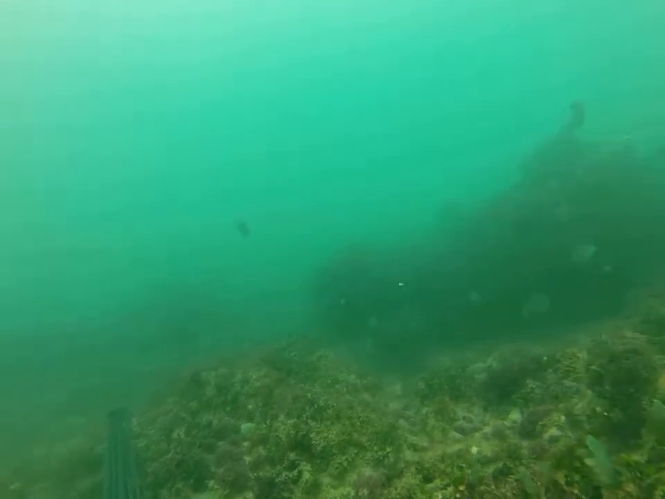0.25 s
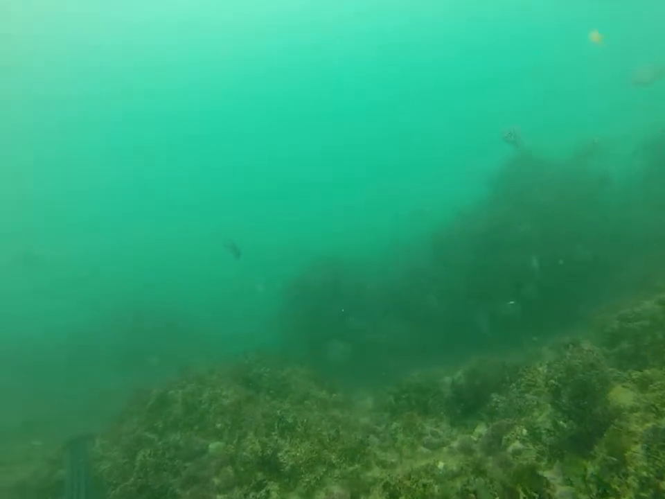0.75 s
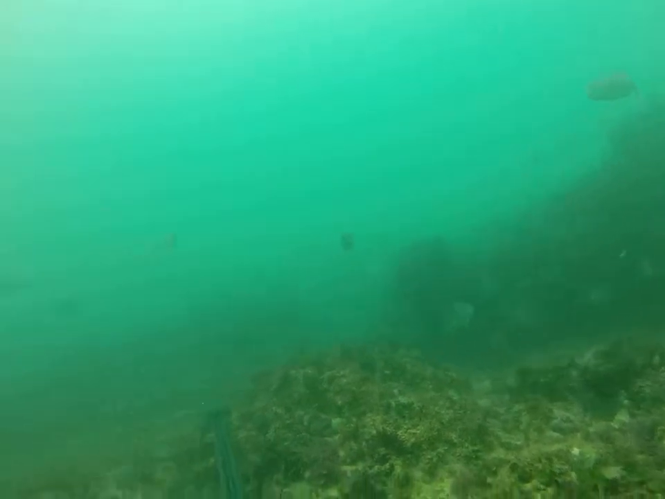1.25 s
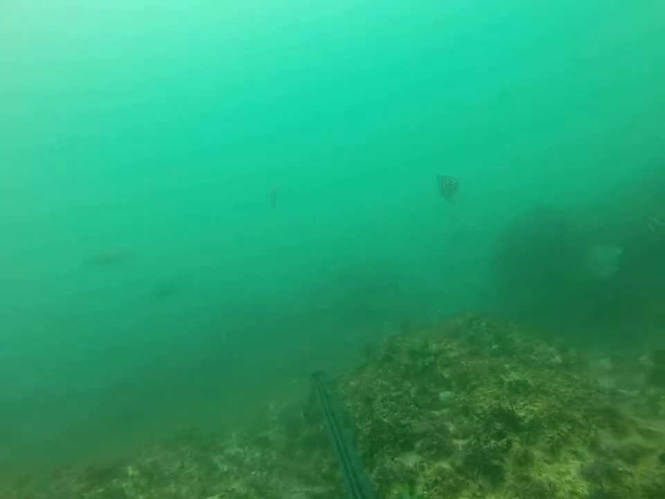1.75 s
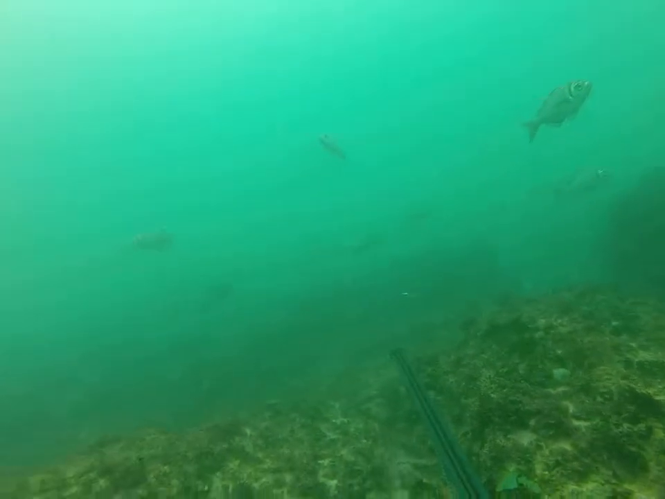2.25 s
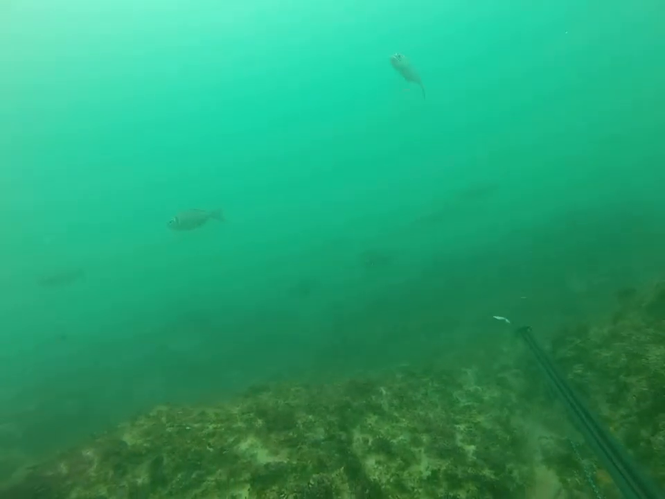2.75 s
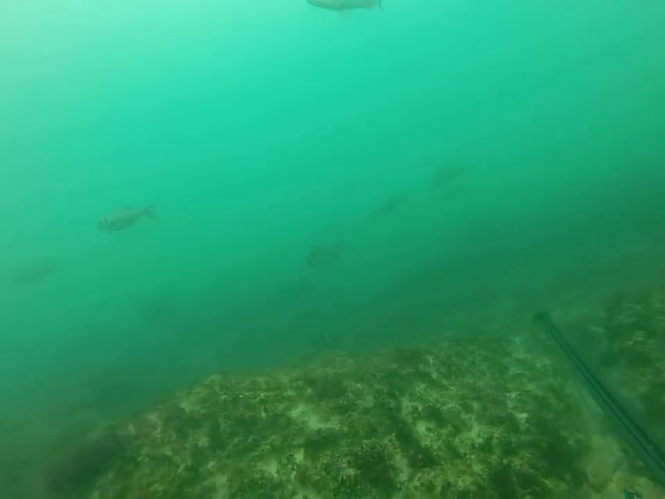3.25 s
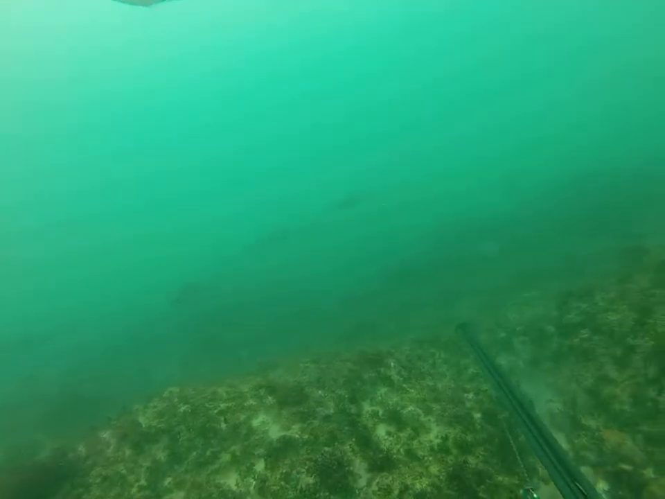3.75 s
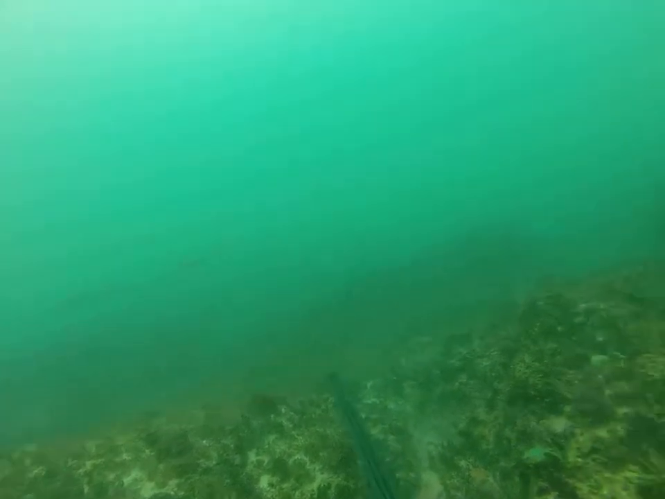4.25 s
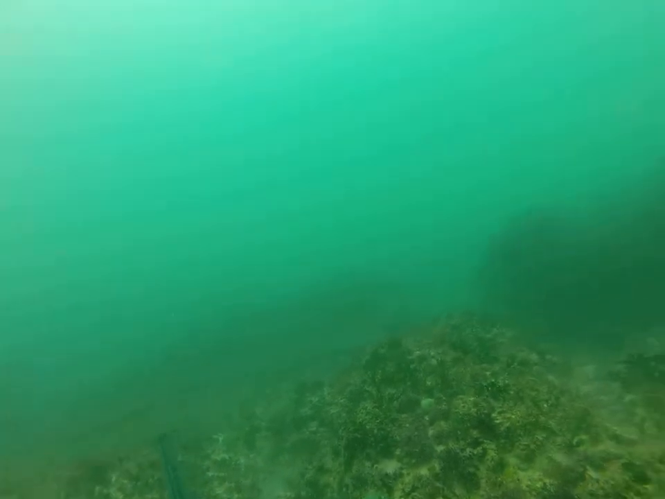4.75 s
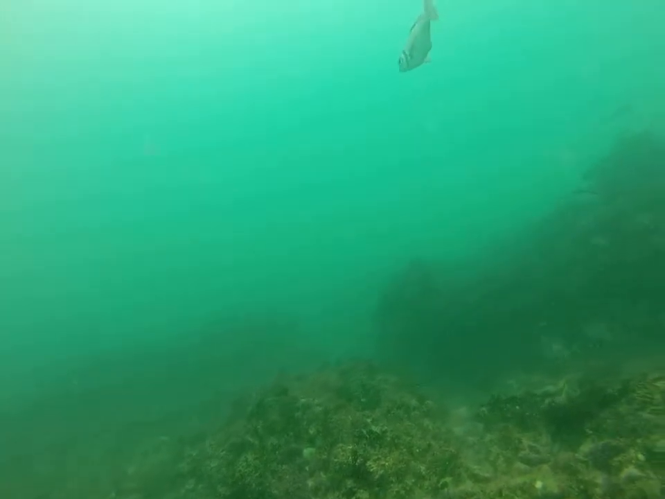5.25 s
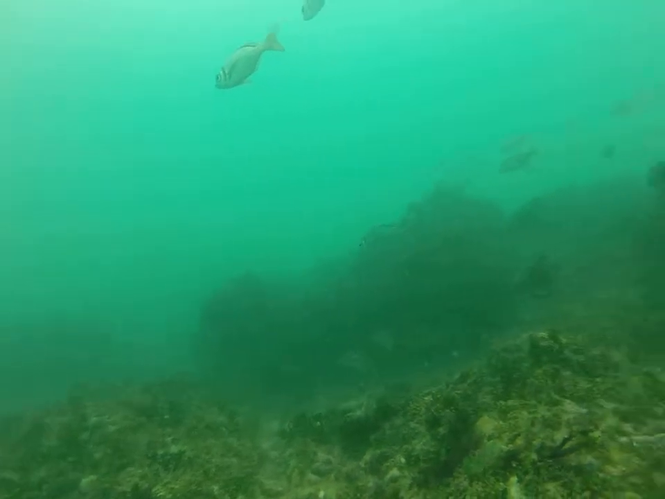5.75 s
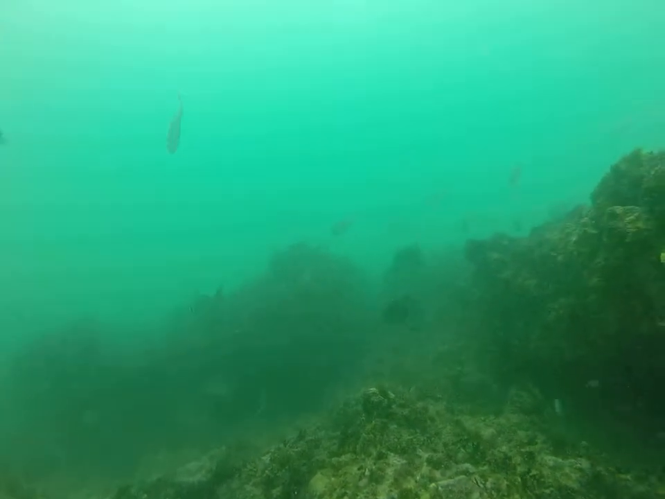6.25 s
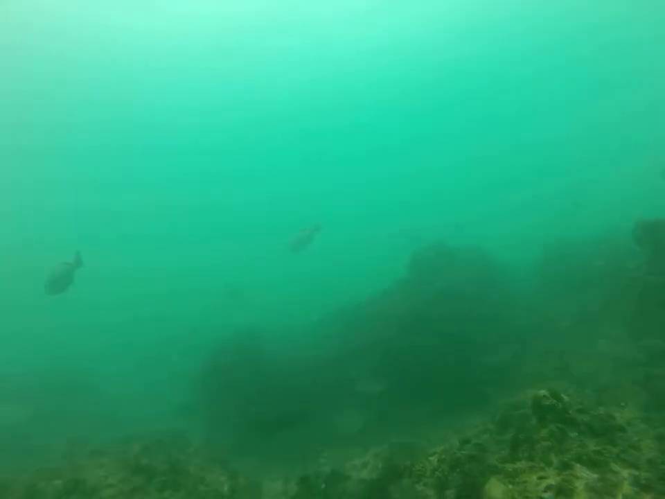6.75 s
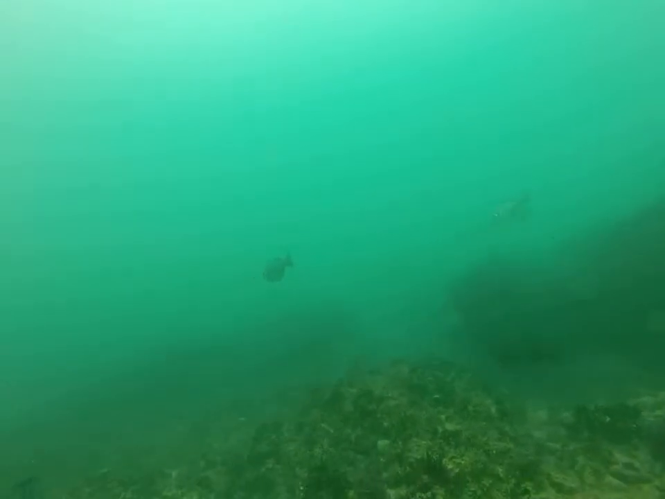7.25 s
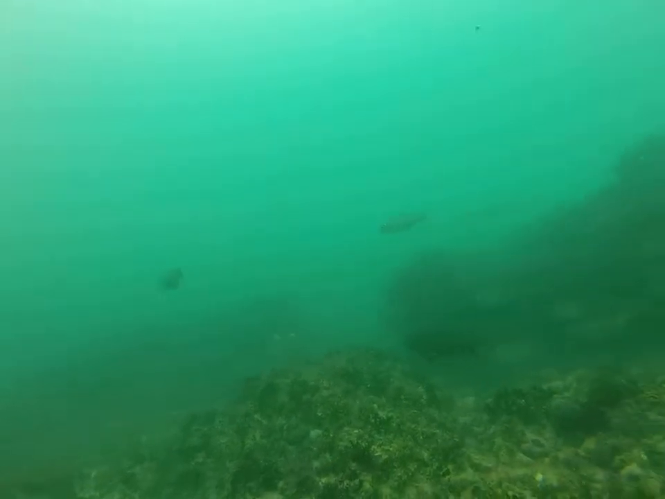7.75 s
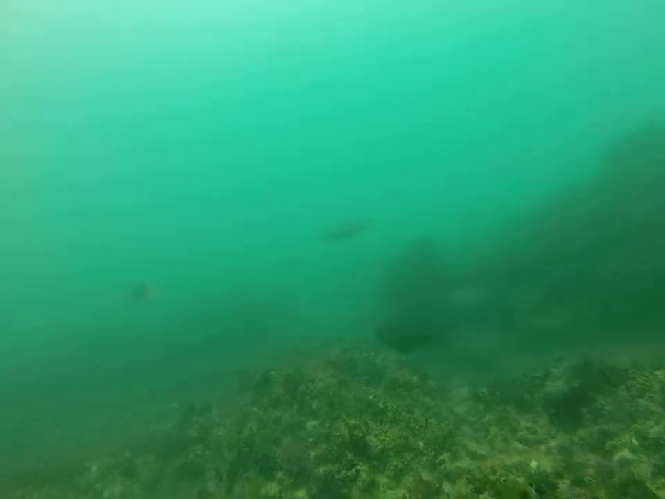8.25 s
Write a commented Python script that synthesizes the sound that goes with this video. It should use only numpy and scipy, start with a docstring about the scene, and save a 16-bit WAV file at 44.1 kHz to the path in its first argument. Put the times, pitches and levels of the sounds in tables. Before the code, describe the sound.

Underwater over a rocky reef, heard through one microphone sealed in a camera housing. A fine crackle of countless distant shrimp runs throughout over faint hiss and low, lumpy water rumble, with nearer dry snaps clicking irregularly, some noticeably louder. Soft pops and faint thumps come around 0.8 seconds. At 2.0 a heavy dull thump lands with hollow pops and a thin strap creak, followed by gurgle and light rubbing. A lone tick sounds at 3.5. At 4.6 another thump brings pops, creaks and a short scrape; a quick creaky stutter follows near 5.1. At 5.96 a deep thud leads into dragging and gurgling until about 6.3. From 6.74 to 6.94 sharp gear ticks cluster around one very loud, hard crack at 6.83, with a low thump. A softer bump and gurgle follow at 7.1, then sparse snaps continue to the end at about 8.5.

```python
"""Shrimp snaps crackle near and far, one crack very close, each ringing the housing of a camera
that drifts with a spear fisher over a rocky reef. Gear ticks, pops, creaks, thumps and drags on the case.
Water rumbles past it and a steady hiss lies under all. Snaps and gear are pulses striking decaying sines
or short ringing bursts; drags, water and hiss are filtered noise. One microphone, inside the housing."""
import sys
import numpy as np
from scipy import signal
from scipy.fft import rfft, irfft
from scipy.io import wavfile

SR = 44100
rng = np.random.default_rng(int(sys.argv[2]) if len(sys.argv) > 2 else 0)


def wav_out(sig):
    """Save sig, one row per channel (or a flat mono array), as 16-bit PCM at SR to the path in sys.argv[1]."""
    wavfile.write(sys.argv[1], SR, np.round(np.clip(np.atleast_2d(sig).T, -1, 1) * 32767).astype(np.int16))


N = 374850    # length in samples, 8.5 s

# Single shrimp snaps around the camera; the mode levels are relative to level_db:
# start_s [s], level_db [dB], low_modes_db [dB], treble_modes_db [dB]
SHRIMP_SNAPS = [(0.003, -36, -8, -5), (0.1872, -25, -19, -13), (0.2467, -30, -11, -18),
                (0.3341, -27, 9, -17), (0.391, -36, -2, -10), (0.4495, -38.5, -22, -7),
                (0.5191, -34.5, 4, -22), (0.525, -37.5, -16, -7), (0.6627, -36, -4, -12),
                (0.7211, -37.5, 3.5, -10), (0.844, -22, 1.5, -1), (0.8936, -34, -10, -11),
                (0.9287, -37, -10, -3), (1.303, -34, 0, -17), (1.388, -22, -4, -16),
                (1.5931, -36, -13, -6.5), (1.699, -31, -1, -29), (1.731, -26.5, -14, -8),
                (1.7422, -33, -10, -4), (1.7818, -32.5, 2.5, -10.5), (1.836, -30, -21, -12.5),
                (1.9476, -41.5, -13, -11), (1.9864, -36.5, 5, -25), (2.0241, -38, 8.5, -16),
                (2.0558, -37.5, -5, -6.5), (2.1475, -36.5, -4, -12), (2.248, -29, -2, -7.5),
                (2.4154, -37.5, -16, -3), (2.5005, -26, -4.5, -16.5), (2.6212, -32, -0.5, -25),
                (2.7465, -22, -0.5, -9.5), (2.8773, -40, -13, -4), (2.9163, -24.5, -2.5, -36),
                (3.0536, -31.5, -29, -8), (3.3024, -37.5, -5, -12), (3.3276, -28, -7, -10),
                (3.347, -40, -8, -12), (3.8525, -35, -10, -16), (4.0234, -39, -3, -18),
                (4.037, -39, -10, -12), (4.097, -41.5, -13, -7), (4.1933, -36, -15, -13),
                (4.2174, -37.5, 1, -10), (4.2571, -31.5, -9, -5), (4.2633, -34, -15, -14),
                (4.3349, -30.5, -13, -15), (4.4634, -40, -15, -10), (4.5755, -37, 0, -19),
                (4.7596, -24.5, -9, -20), (4.768, -39, 7, -6.5), (4.7745, -35, -4, -20),
                (4.7921, -29.5, -1, -18), (4.964, -23.5, 7, -15), (5.1449, -25, -3, -13.5),
                (5.2084, -26, 2, -17), (5.271, -21, -25, -11.5), (5.277, -32, -15, -4),
                (5.3242, -38, -14, -11), (5.3895, -38.5, -21.5, -6), (5.4084, -46, -3, -1),
                (5.526, -35, -8, -9), (5.7741, -36, -9, -11), (5.9876, -33, -9, -6), (6.066, -37, -15, -21),
                (6.1555, -27, -18, -15), (6.2, -42, -3, -7), (6.24, -32, -14, -11), (6.269, -38.5, 4, -31),
                (6.353, -32.5, 1.5, -10.5), (6.56, -44, 6, -2.5), (6.6167, -19.5, 4, -19),
                (6.7409, -33, 14.5, -37), (6.981, -31.5, -4, -10), (7.0546, -27, -7, -13),
                (7.161, -23, -40, -5.5), (7.2833, -38, -7, -24), (7.3092, -33, 2, -8),
                (7.3138, -26, -11, -16.5), (7.6474, -39.5, 0, -8), (7.7135, -26.5, 0, -13),
                (7.734, -36, -3, -14), (7.7808, -43, -6, -4), (7.8002, -31, -13, -10.5),
                (8.1554, -36.5, 4.5, -10), (8.3624, -34, -6, -26), (8.3779, -32.5, 3, -20),
                (8.415, -32, -8, -5)]
# Modes of the housing wall when a pressure pulse strikes it:
# pitch_hz [Hz], t60_s [s], snap_level_db [dB], close_crack_level_db [dB]
HOUSING_MODES = [(1820, 0.036, -9, -19), (2023, 0.0051, 6, 6), (2453, 0.0054, 1, -43),
                 (2894, 0.0086, -2, -1), (3183, 0.011, -7.5, -5.5), (3940, 0.0085, -26, -13),
                 (5160, 0.0057, 2, -10), (5880, 0.0036, 1.5, -33), (6910, 0.0036, 0, -21),
                 (8782, 0.0054, 0, -30), (10350, 0.0031, 5.5, -32), (11820, 0.003, 5, -21)]
TOP_MODES_DB = -10    # highest modes, relative to the treble modes
# A fainter snap is farther off: bounces grow (dB per dB) against the direct sound
LOUD_SNAP_DB, LOUD_BOUNCES_DB, BOUNCES_PER_DB_FAINTER = -24.5, -15, 0.2974
CRACK_S, CRACK_BOUNCES_DB = 6.8311, -25
CRACK_ECHO_S, CRACK_ECHO_DB = 0.0061, -15.5
FAR_SNAPS_PER_S, FAR_FLOOR_DB, FAR_SPREAD_DB = 170, -66, 6    # the rate is typical: it drifts


def snaps():
    """Every pulse strikes all housing modes, a little differently each time; far shrimp crackle at random."""
    start_s, level_db, low_db, treble_db = np.transpose(SHRIMP_SNAPS)
    bounces_db = LOUD_BOUNCES_DB + BOUNCES_PER_DB_FAINTER * (LOUD_SNAP_DB - level_db)
    paths = arrivals(bounces_db)
    uneven_db = 3 * rng.standard_normal((len(start_s), len(HOUSING_MODES)))

    crack = arrivals([CRACK_BOUNCES_DB])
    crack[0, int(CRACK_ECHO_S * SR)] = -from_db(CRACK_ECHO_DB)    # one clear bounce off the nearest rock
    crack = place([CRACK_S], crack)

    chance_per_sample = FAR_SNAPS_PER_S / SR * from_db(4.0 * drift(3.0))
    far = rng.random(N) < chance_per_sample
    far_db = FAR_FLOOR_DB + FAR_SPREAD_DB * np.minimum(rng.exponential(1, N), 3.0)[far]

    out = np.zeros(N)
    groups_db = [low_db, 0 * start_s, treble_db, treble_db + TOP_MODES_DB]
    for k, (hz, t60, snap_db, crack_db) in enumerate(HOUSING_MODES):
        group_db = groups_db[np.searchsorted([2250, 4450, 8000], hz)]
        strike = from_db(level_db + group_db + uneven_db[:, k])
        struck = place(start_s, paths * strike[:, None])
        far_uneven_db = 9.1 * rng.standard_normal(N)[far].clip(-3, 1.6)
        struck[far] += from_db(far_db - 2.39 * hz / 1000 + far_uneven_db)    # weaker towards the treble
        mode = ring(from_db(snap_db) * struck + from_db(crack_db) * crack, hz, t60)
        out += band(mode, 0.6 * hz, 1.4 * hz, order=1)    # the wall takes a moment to get moving
    return band(out, 2404, 11300)    # a stiff wall passes little bass


BOUNCES_T60_S = 0.062


def arrivals(bounces_db):
    """Each source sends a direct pulse, then a sparse, dying shower of bounces off the reef; one row each."""
    t = np.arange(SR // 16) / SR
    shape = (len(bounces_db), len(t))
    size, pick = rng.standard_normal(shape), rng.random(shape)
    fade = from_db(np.reshape(bounces_db, (-1, 1)) - 60 * t / BOUNCES_T60_S)
    rows = size * (pick < 0.06) * fade * (t > 0.001)
    rows[:, 0] = -1    # the direct pulse
    return rows


# Gear slipping on the case: # release_s [s], level_db [dB], pulse_length_s [s]
GEAR_TICKS = [(3.5496, -21, 0.001), (6.7412, -19, 0.00092), (6.774, -13.5, 0.00085), (6.786, -24.5, 0.0011),
              (6.8075, -17, 0.00092), (6.845, -13, 0.00072), (6.859, -19, 0.00099), (6.871, -27, 0.0013),
              (6.892, -21.5, 0.0011), (6.9273, -17.5, 0.00083), (6.943, -22.5, .0012)]
# Modes the case rings with after a tick, relative to it: pitch_hz [Hz], level_db [dB], t60_s [s]
CASE_MODES = [(770, -5, 0.013), (1230, -11, 0.0084), (1930, -7.5, 0.01), (2350, -12, 0.0059),
              (3030, -36.5, 0.0098)]


def ticks():
    """A slip loads slowly and lets go at once: a rise, a steep fall through zero, then the case rings."""
    release_s, level_db, length = np.array(GEAR_TICKS).T[:, :, None]
    t = np.arange(-400, 400) / SR
    fall = -np.tanh(t / (0.16 * length))
    fade = np.exp(-np.abs(t) / np.where(t < 0, 0.64 * length, 0.62 * length))
    pulses = fall * fade
    pulses = from_db(level_db) * pulses / pulses.max(axis=1, keepdims=True)
    out = place(release_s[:, 0] + t[0], pulses)
    for hz, db, t60 in CASE_MODES:    # just after the fall each mode is struck a little differently
        strike = from_db(level_db + db + 2 * rng.standard_normal(release_s.shape))
        struck = place(release_s[:, 0] + 0.00063, strike)
        out += band(ring(struck, hz, t60), 0.65 * hz, 1.4 * hz, order=1)
    return band(out, 8, 3400, order=4)    # a rubbery contact makes no treble


# Short hollow pops: start_s [s], level_db [dB], pitch_hz [Hz]
HOLLOW_POPS = [(0.77, -32, 860), (0.829, -33, 790), (0.867, -33, 800), (0.888, -39.5, 860),
               (1.484, -38, 756), (2.035, -23, 634), (2.049, -21.5, 757), (2.052, -22, 830),
               (4.022, -41, 780), (4.227, -39, 780), (4.574, -23, 746), (4.594, -29.5, 824),
               (4.655, -34, 783), (4.827, -37, 480), (5.972, -25, 457), (6.02, -30.5, 412),
               (6.269, -36, 770), (7.073, -35, 443), (7.092, -36, 800), (7.267, -30, 775),
               (8.153, -37.5, 770)]
# Stick-slip runs of pops: start_s [s], end_s [s], slips_per_s [1/s], level_db [dB], pitch_hz [Hz]
POP_SLIP_RUNS = [(3.151, 3.235, 52, -41, 810), (5.1654, 5.19, 60, -40, 900)]
POP_T60_S = 0.031
POP_OVERTONE, POP_OVERTONE_DB = 2.1, -5    # second mode: ratio to the pitch, level relative to the first
POP_OVERTONE_TOP_DB = -40    # heavy pops are blunt: the second mode is set no louder than this


def pops():
    """Each pop rings at its pitch and, fainter, at a second mode above."""
    rows = np.array([*HOLLOW_POPS, *slips(POP_SLIP_RUNS)])
    overtones = rows * [1, 1, POP_OVERTONE] + [0, POP_OVERTONE_DB, 0]
    overtones[:, 1] = np.minimum(overtones[:, 1], POP_OVERTONE_TOP_DB)
    body = knocks(lasting(rows, POP_T60_S), cycles=1.3, rough=0.93)
    return body + knocks(lasting(overtones, POP_T60_S), cycles=3.5, rough=1.0)


# Thin creaks of a strap or rubber band slipping: start_s [s], level_db [dB], pitch_hz [Hz]
STRAP_CREAKS = [(1.5135, -31, 1870), (1.9864, -19.5, 1805), (2.0642, -30, 1630), (2.1784, -37, 2400),
                (2.2094, -31, 1620), (3.1023, -35.5, 2180), (4.577, -32, 2130), (4.6603, -31.5, 1840)]
# Stick-slip runs of creaks: start_s [s], end_s [s], slips_per_s [1/s], level_db [dB], pitch_hz [Hz]
CREAK_SLIP_RUNS = [(5.09, 5.145, 102.2, -34.5, 1970)]
CREAK_T60_S = 0.015


def creaks():
    """A slipping strap gives thin, high, very short knocks, singly or in a quick train."""
    rows = [*STRAP_CREAKS, *slips(CREAK_SLIP_RUNS)]
    return knocks(lasting(rows, CREAK_T60_S), cycles=2.6, rough=0.9)


# Dull thumps on the case and low gurgles of water: start_s [s], level_db [dB], pitch_hz [Hz], t60_s [s]
THUMPS_AND_GURGLES = [(.77, -33.5, 89, 0.13), (.866, -25, 121, 0.065), (.884, -27, 95, .06), (1.16, -36, 81, 0.19),
                      (2.035, -7, 115, 0.029), (2.04, -21, 324, 0.023), (2.25, -26.5, 89, 0.077),
                      (2.35, -33, 112, 0.15), (3.27, -34.5, 120, 0.15), (4.5655, -9, 125, 0.066),
                      (4.567, -27, 274, 0.031), (4.575, -23, 282, 0.067), (4.59, -32.5, 210, 0.2),
                      (4.655, -18.5, 91, 0.072), (5.094, -31, 105, .1), (5.112, -27.5, 108, 0.14),
                      (5.14, -33, 79, 0.27), (5.951, -22, 70, .04), (5.96, -7, 87.4, 0.11), (6.2, -29, 130, 0.093),
                      (6.235, -26, 104, 0.15), (6.783, -16, 88, 0.077), (7.088, -19.5, 102.4, 0.045)]


def thumps_and_gurgles():
    """A blow on the case or a gurgle of water swells fast and rings down low, with some rattle."""
    return knocks(THUMPS_AND_GURGLES, cycles=0.4, rough=0.62)


SLIP_UNEVEN_DB, SLIP_PITCH_SPREAD = 3.5, 0.028    # the pitch spread is a fraction of the pitch


def slips(runs):
    """A stick-slip run becomes evenly spaced slips, each a little different in strength and pitch."""
    rows = np.array([(s, db, hz)
                     for start, end, rate, db, hz in runs
                     for s in np.arange(start, end, 1 / rate)])
    chance = rng.standard_normal((len(rows), 2))
    rows[:, 1] += SLIP_UNEVEN_DB * chance[:, 0]
    rows[:, 2] *= 1 + SLIP_PITCH_SPREAD * chance[:, 1]
    return rows


def lasting(rows, t60):
    """Give every row the same ring time."""
    return [(*row, t60) for row in rows]


def knocks(table, cycles, rough):
    """A soft contact swells over the given cycles of its pitch while it rings down; rough ones rattle."""
    out = np.zeros(N)
    t = np.arange(SR // 4) / SR
    for start_s, level_db, hz, t60 in table:
        rise = 1 - np.exp(-(t * hz / cycles) ** 2)
        fade = from_db(level_db - 60 * t / t60)
        noise = band(rng.standard_normal(len(t)), 0.73 * hz, 1.354 * hz, order=3)
        rattle = rough * noise * np.sqrt(SR / hz / 4)    # evens out the loudness of narrow bands
        body = rise * fade * (-np.sin(2 * np.pi * hz * t) + rattle)
        at = round(start_s * SR)
        out[at:at + len(t)] += body[:N - at]
    return out


# Something drags over the case: start_s [s], end_s [s], level_db [dB], centre_hz [Hz]
CASE_DRAGS = [(2.2, 2.246, -49, 2100), (2.312, 2.432, -48.5, 324), (4.566, 4.62, -42, 750),
              (4.65, 4.688, -56, 1900), (5.975, 6.2, -53, 520), (5.999, 6.254, -46, 324)]
RASP_CATCHES_PER_CYCLE, RASP_WIDTH = 1.2, 1.55    # band runs from centre / width to centre * width


def rasps():
    """Dense uneven catches through a broad band, fading as the drag eases."""
    now, out = np.arange(N) / SR, np.zeros(N)
    size, pick = rng.standard_normal(N), rng.random(N)
    for start, end, db, hz in CASE_DRAGS:
        catches = size * (pick < RASP_CATCHES_PER_CYCLE * hz / SR)
        grain = rms_one(band(catches, hz / RASP_WIDTH, hz * RASP_WIDTH))
        done = np.clip((now - start) / (end - start), 0, 1)
        swell = np.sqrt(np.sin(np.pi * done).clip(0))
        out += from_db(db - 8.6 * done) * swell * grain
    return out


# Gurgle of water moving past the case: time_s [s], level_db [dB]
GURGLE_LEVEL = [(0.0, -61), (0.42, -63), (0.9, -52.5), (1.7, -59), (2.1, -42.5), (2.45, -47.5), (2.72, -58),
                (3.4, -52), (3.64, -60.5), (4.9, -55.5), (5.7, -55), (5.99, -55), (6.13, -39.5),
                (6.53, -64.5), (7.05, -44.5), (7.29, -56), (7.55, -58), (8.2, -62), (8.5, -47)]
# Swell pushing on the case: time_s [s], level_db [dB]
SWELL_LEVEL = [(0.0, -45), (0.28, -43), (1.68, -46), (2.1, -39), (3.15, -43.5), (5.78, -46.5),
               (5.94, -45.5), (6.23, -40.5), (7.36, -42.5), (8.5, -50)]
CALM_DB, RUB_DB, RUB_FOLLOWS = -59, -60, 0.18    # calm gurgle, rustle then, its share of the gurgle's swing


def flow():
    """Lumpy low noise: slow surge, quicker gurgle, and a grainy rubbing rustle above."""
    now = np.arange(N) / SR
    surge_db = np.interp(now, *np.transpose(SWELL_LEVEL))
    gurgle_db = np.interp(now, *np.transpose(GURGLE_LEVEL))
    rub_db = RUB_DB + RUB_FOLLOWS * (gurgle_db - CALM_DB)
    white = rng.standard_normal((3, N))
    surge = rms_one(band(white[0], 9.7, 40.9)) * from_db(surge_db)
    gurgle = rms_one(band(white[1], 29.0, 141.4, order=3)) * from_db(gurgle_db + 2.0 * drift(8.4))
    rub = rms_one(band(white[2], 130, 846)) * from_db(rub_db + 2.34 * drift(35.0))
    return surge + gurgle + rub


# Colour of the hiss, only its shape counts: pitch_hz [Hz], level_db [dB, relative]
HISS_COLOUR = [(120, -48), (200, 3.5), (601, -18), (821, -3.5), (1300, -10.5), (1740, -4.5), (2650, -8),
               (2960, -4.5), (4120, -12.5), (5130, -14), (11900, -26), (14300, -31.5), (16000, -60)]
HISS_DB = -60    # rms, about which it drifts


def hiss():
    """Smooth wash of countless far snaps and the microphone's own noise, as coloured noise."""
    hz = np.maximum(np.arange(N // 2 + 1) * SR / N, 1)
    table_hz, table_db = np.transpose(HISS_COLOUR)
    colour = from_db(np.interp(np.log(hz), np.log(table_hz), table_db))
    wash = rms_one(irfft(rfft(rng.standard_normal(N)) * colour, N))
    return from_db(HISS_DB + 1.0 * drift(2.5)) * wash


def from_db(db):
    """Decibels to gain."""
    return 10 ** (np.asarray(db) / 20)


def rms_one(x):
    """Scale to unit rms."""
    return x / np.sqrt(np.mean(x ** 2) + 1e-20)


def ring(x, hz, t60):
    """A two-pole resonator: a unit click sets a decaying sine of height 1 ringing."""
    r, w = from_db(-60 / (t60 * SR)), 2 * np.pi * hz / SR
    return signal.lfilter([0, np.sin(w)], [1, -2 * r * np.cos(w), r * r], x)


def band(x, low_hz, high_hz, order=2):
    """Butterworth band-pass."""
    return signal.sosfilt(signal.butter(order, [low_hz, high_hz], "band", fs=SR, output="sos"), x)


def drift(rate):
    """Slow chance with spread 1: noise smoothed at the given rate in Hz, one knot every 40 samples."""
    knots = rng.standard_normal(N // 40 + 2002)
    r = np.exp(-80 * np.pi * rate / SR)
    slow = signal.lfilter([1], [1, -2 * r, r * r], knots)[2000:]    # skip the filter's start-up
    return np.interp(np.arange(N) / 40, np.arange(len(slow)), rms_one(slow))


def place(times, rows):
    """Lay each row into the timeline from its start time."""
    starts = np.round(np.asarray(times) * SR).astype(int)
    at = starts[:, None] + np.arange(rows.shape[1])
    line = np.bincount(at.ravel(), rows.ravel(), N + rows.shape[1])[:N]
    return line + 1e-18    # inaudible offset keeps the filters from vanishingly small numbers


def scene():
    """All sources reach one microphone."""
    gear = ticks() + pops() + creaks() + thumps_and_gurgles() + rasps()
    return (snaps() + gear + flow() + hiss())[None, :]


OVERLOAD, CUTOFF_HZ = 0.9, 16700    # clipping height; nothing is left from the cutoff up


def record(dry):
    """The microphone input clips peaks above the overload height, then the top is cut steeply."""
    clipped = np.clip(dry, -OVERLOAD, OVERLOAD)
    return signal.sosfilt(signal.cheby2(20, 100, CUTOFF_HZ, fs=SR, output="sos"), clipped)


dry = scene()
out = record(dry)
wav_out(out)
```